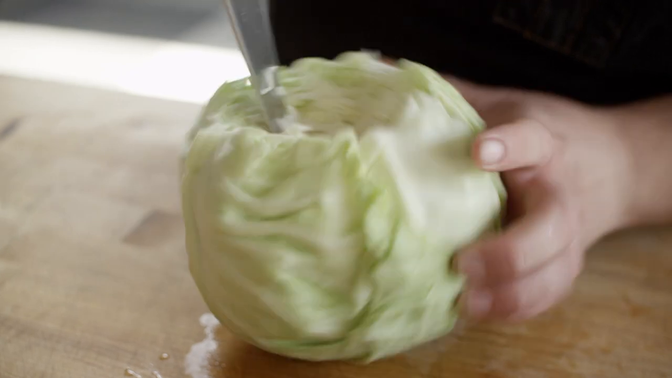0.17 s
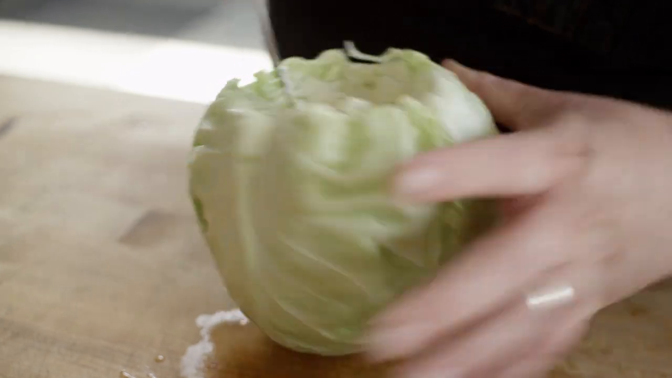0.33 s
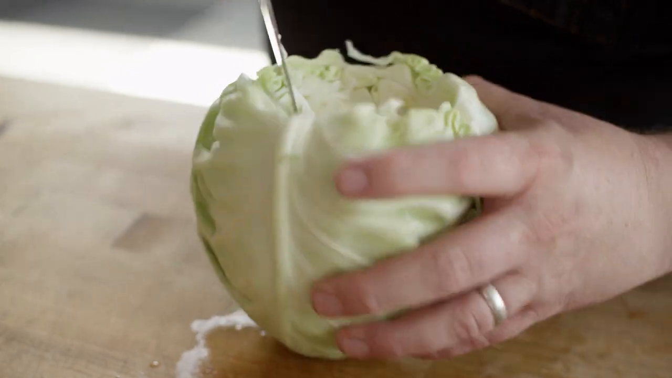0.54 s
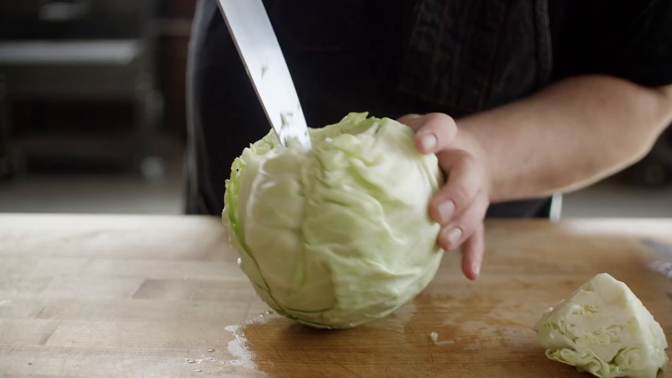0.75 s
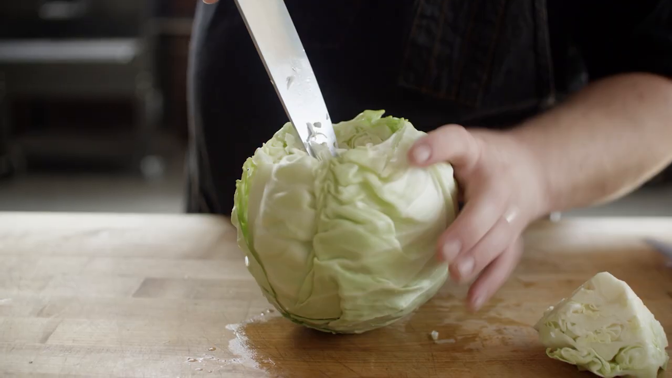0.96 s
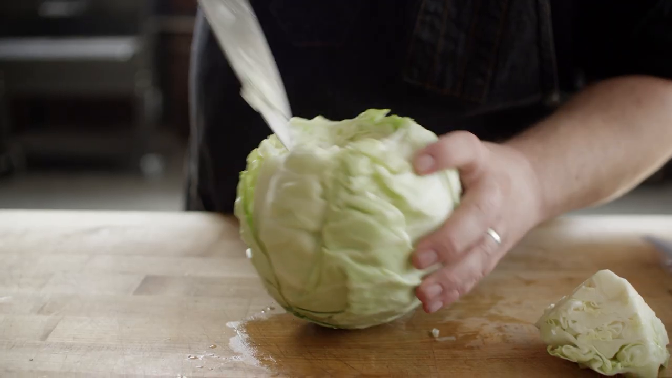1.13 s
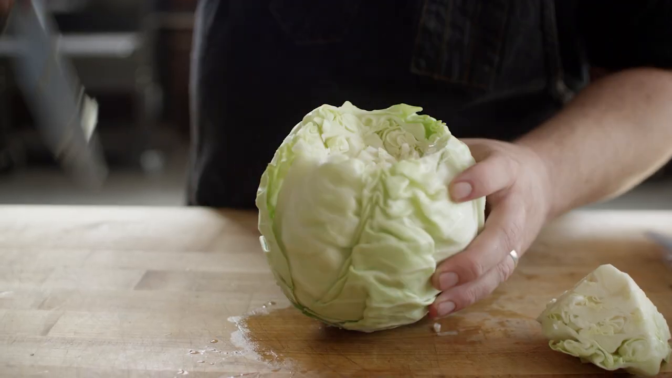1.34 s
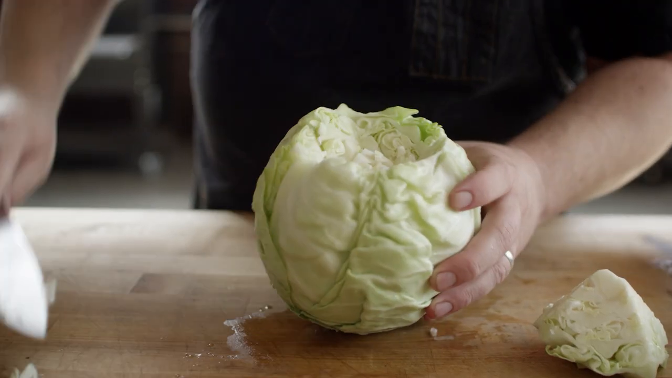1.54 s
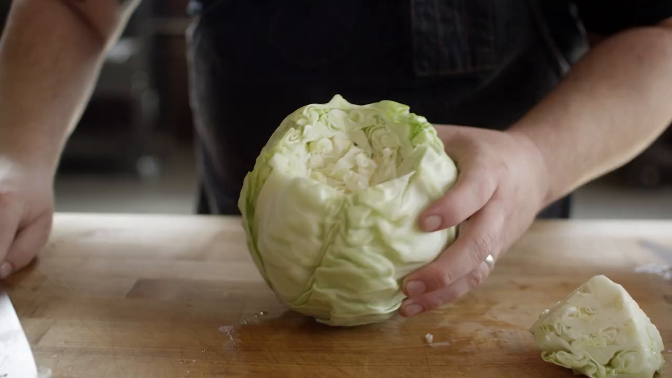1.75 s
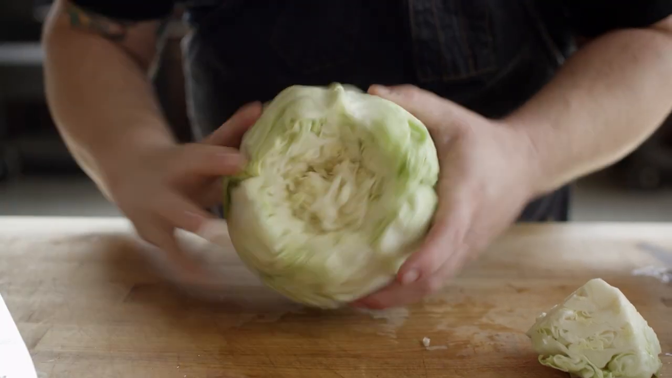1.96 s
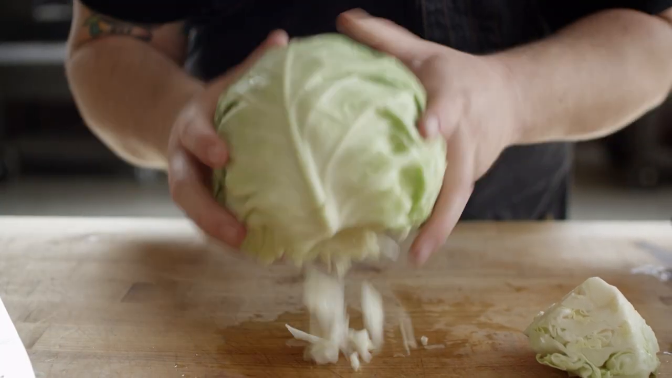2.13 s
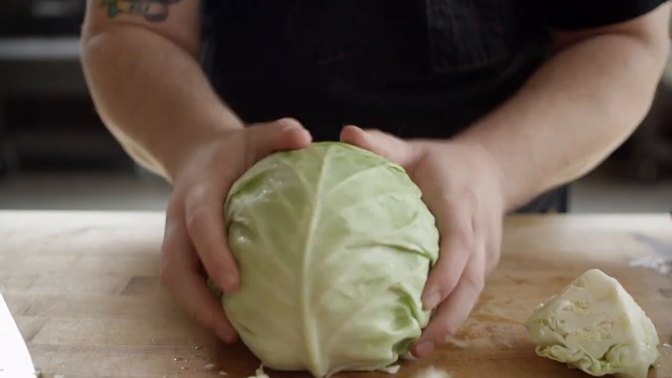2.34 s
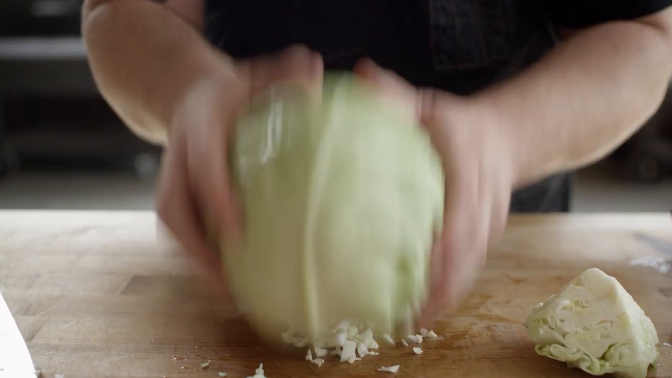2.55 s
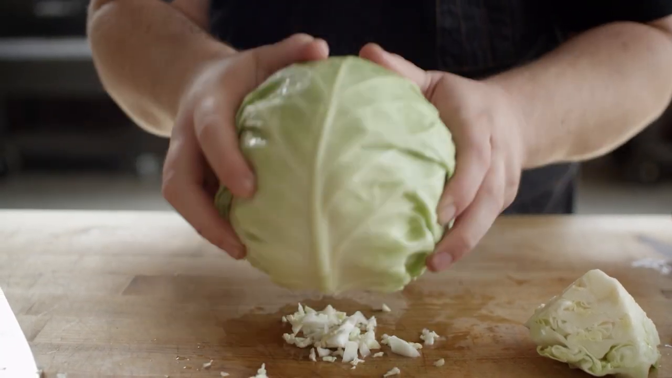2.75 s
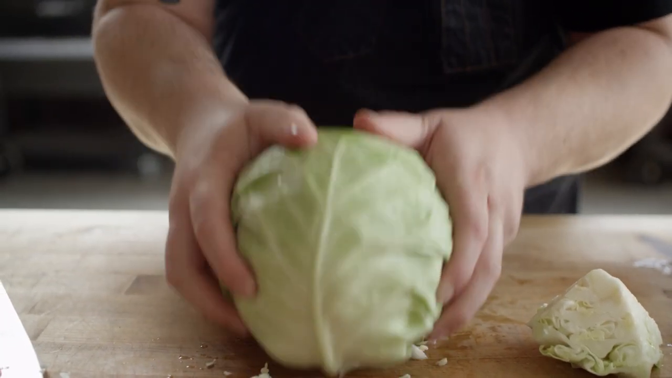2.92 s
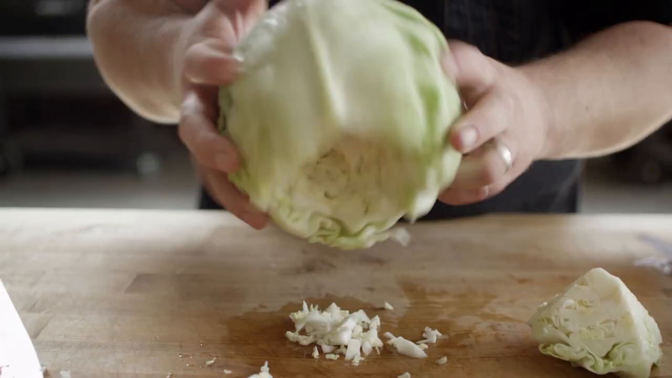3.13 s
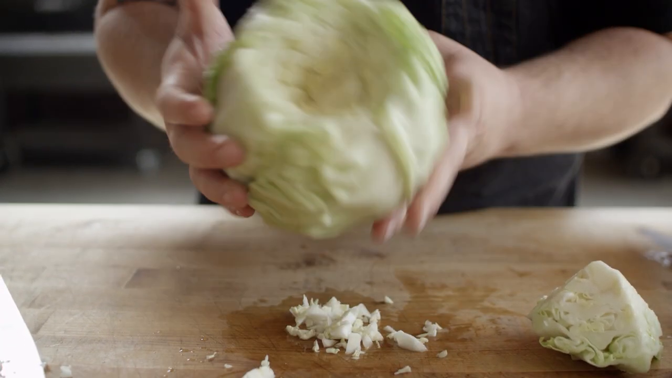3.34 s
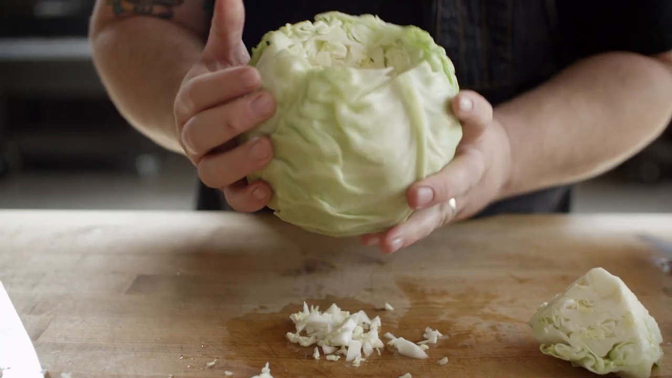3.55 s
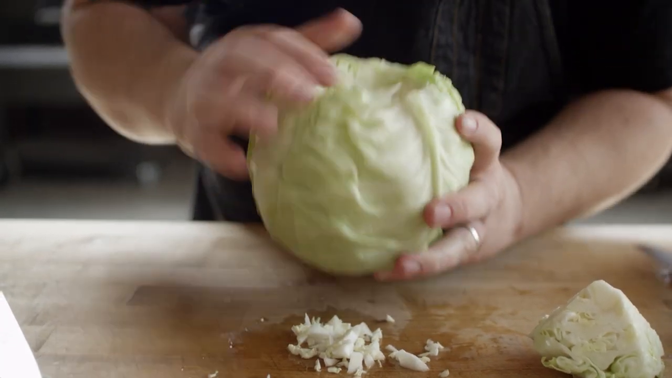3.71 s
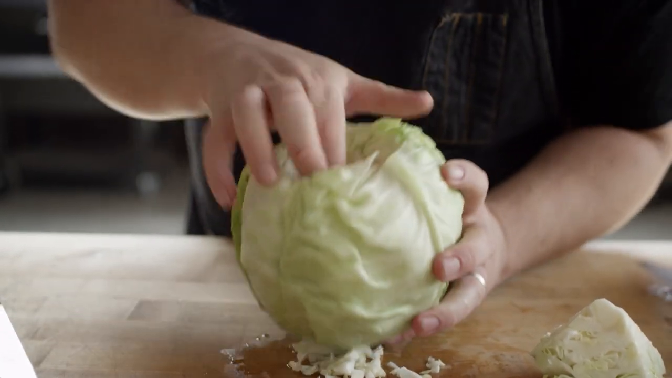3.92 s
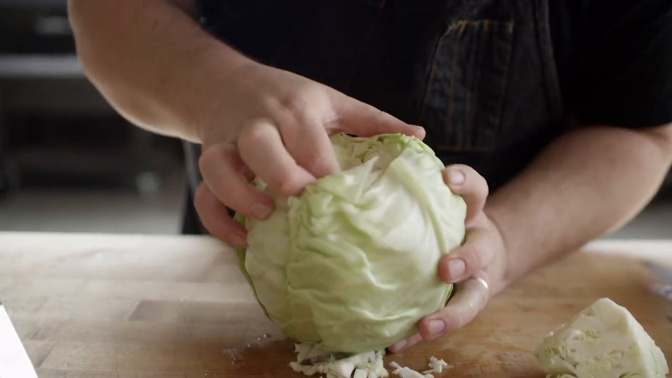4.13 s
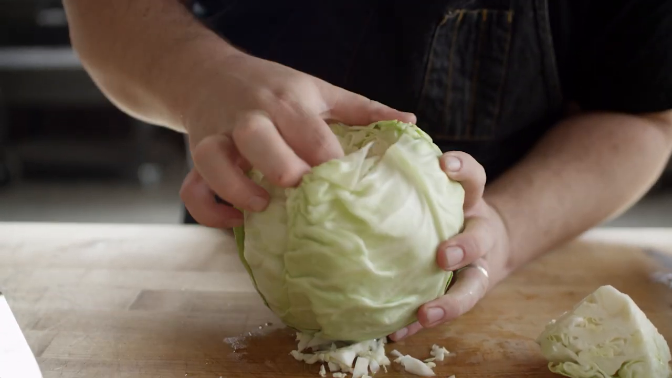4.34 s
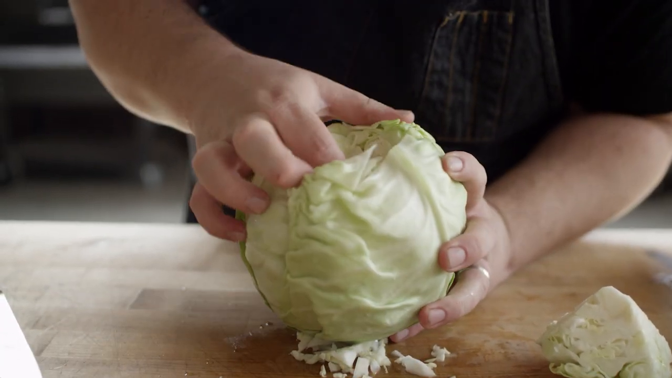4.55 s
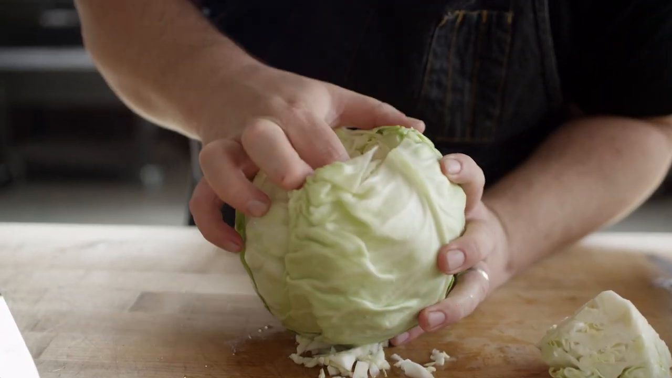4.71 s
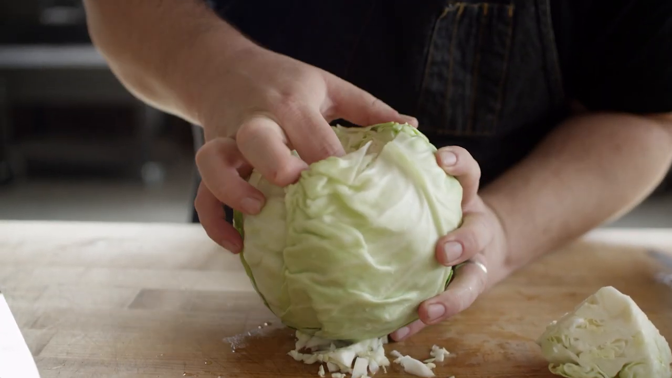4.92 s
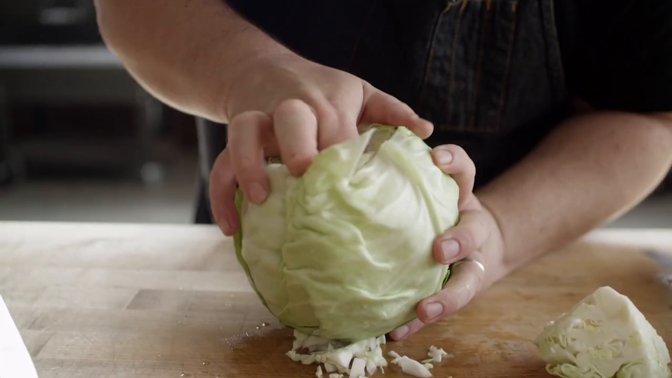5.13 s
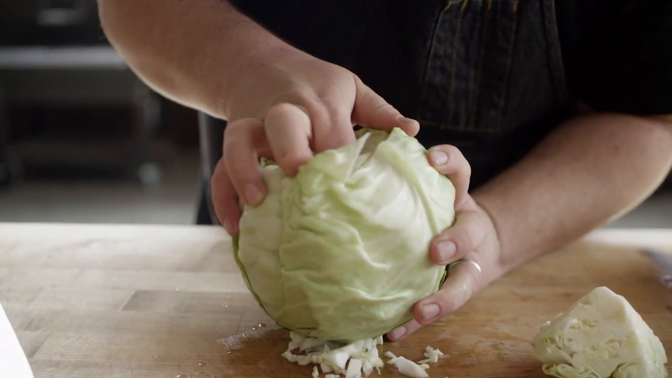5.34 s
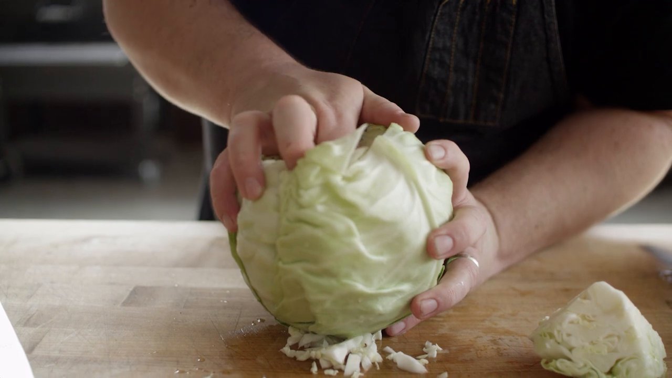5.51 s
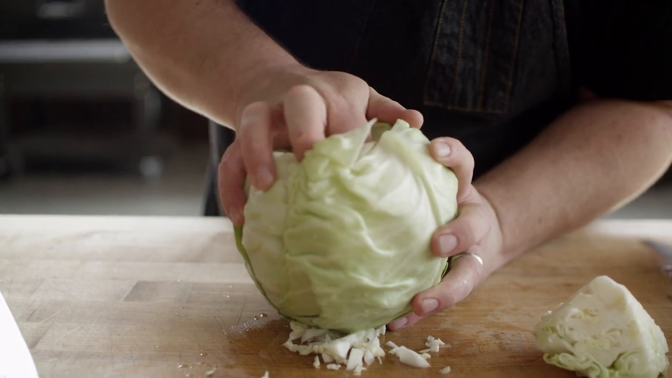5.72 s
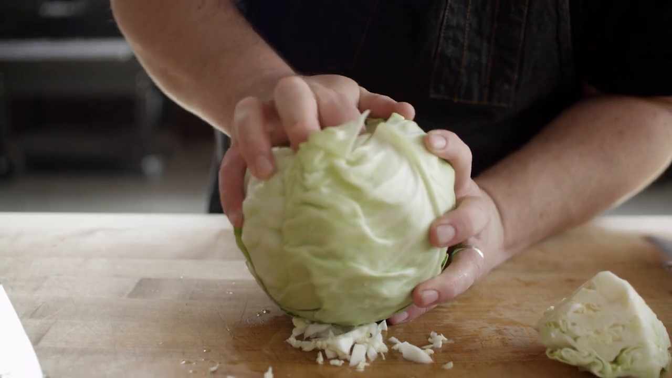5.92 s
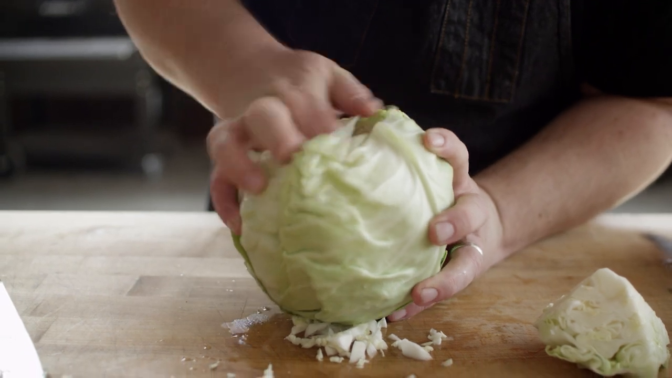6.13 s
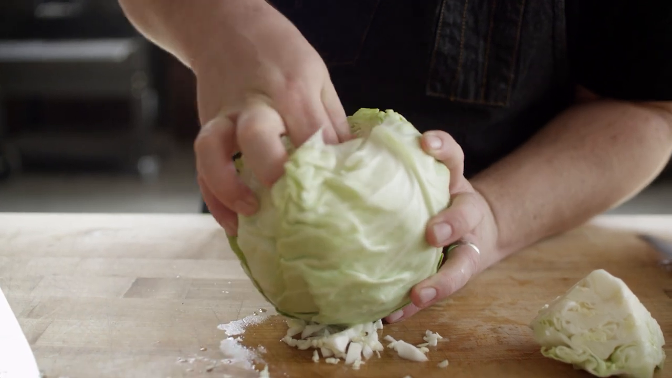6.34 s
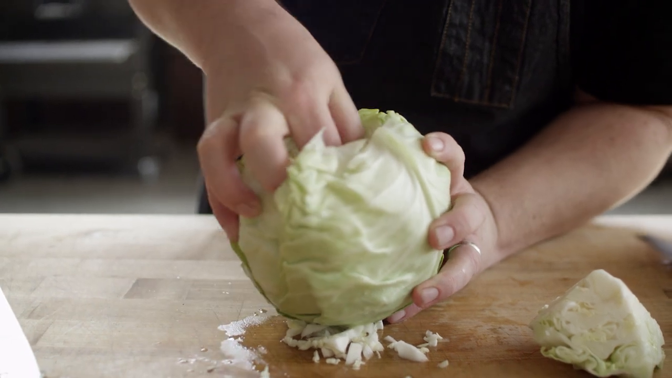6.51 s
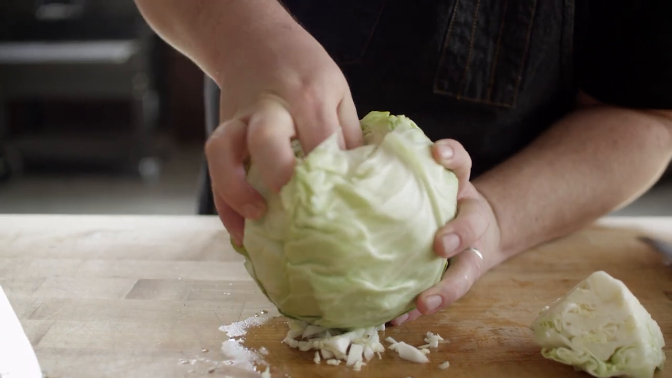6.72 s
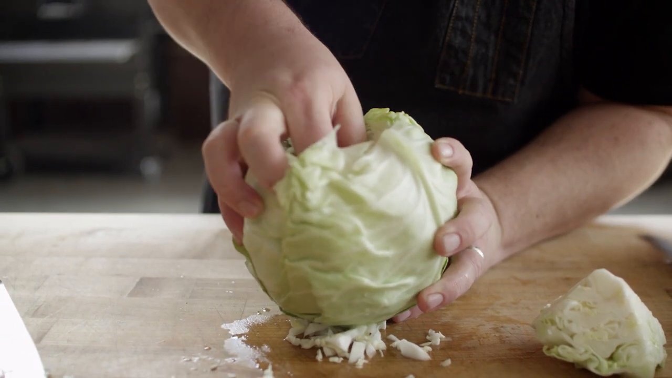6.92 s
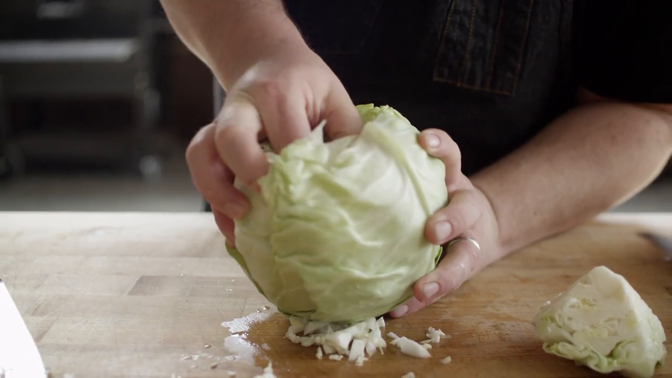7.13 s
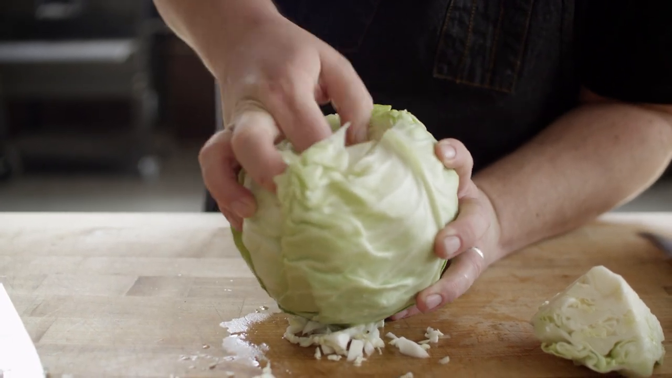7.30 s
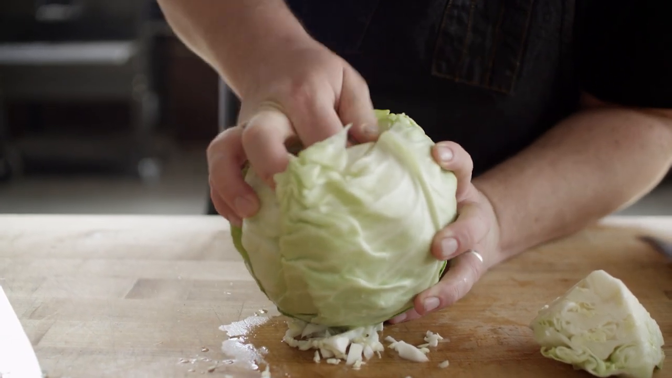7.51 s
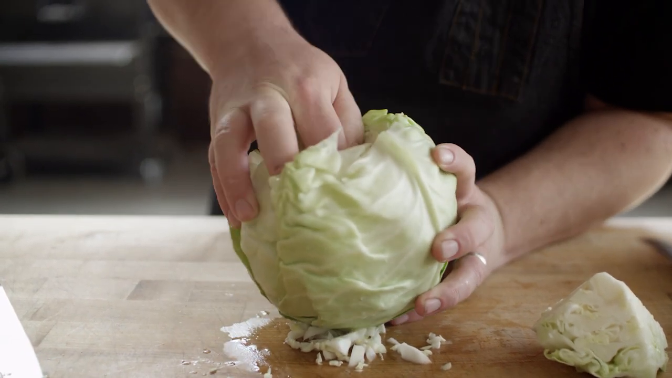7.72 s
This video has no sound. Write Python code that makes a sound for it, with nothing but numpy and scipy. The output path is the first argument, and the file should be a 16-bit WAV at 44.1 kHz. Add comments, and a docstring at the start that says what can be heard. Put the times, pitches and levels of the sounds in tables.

```python
"""A raw cabbage is cored, knocked and picked apart: bursts of noise grains crackle through broad resonances.
A knife pries the core out in short strokes and is laid on a wooden bench, ringing steel and wood modes.
Three knocks of the head thud with sinking pitch, rebound and shed crumbs; loose things chatter as the bench sways.
Then fingers pick at the crisp inner leaves, as a dull rumble of coloured noise, like traffic outside, swells."""
import sys
import numpy as np
from scipy import signal
from scipy.fft import rfft, irfft
from scipy.io import wavfile
from scipy.ndimage import uniform_filter1d

SR = 44100
rng = np.random.default_rng(int(sys.argv[2]) if len(sys.argv) > 2 else 0)


def persist_wave(psi):
    """Save psi, clipped to +-1, as 16-bit WAV."""
    counts = np.round(np.clip(psi, -1, 1) * 32767).astype(np.int16)
    wavfile.write(sys.argv[1], SR, np.atleast_2d(counts).T)


N = 346747
T = np.arange(N) / SR

# knocks of the head on the bench: start_s, thud_db, rebound_slap_db
KNOCKS = [(2.3876, -17, -6), (2.655, -19, -11.5), (2.928, -17.5, -10.5)]


def from_db(db):
    """Decibels to gain."""
    return 10 ** (np.asarray(db) / 20)


def rms_one(x):
    """Scale to unit rms."""
    return x / np.sqrt(np.mean(x ** 2) + 1e-20)


def at_hz(points, hz):
    """Read a table on a log-frequency axis."""
    f, value = np.transpose(points)
    return np.interp(np.log(hz + 1), np.log(f), value)


def colour(x, spectrum, size=4096):
    """Causal (minimum-phase) filter of unit energy with the given spectrum."""
    cepstrum = irfft(np.log(from_db(at_hz(spectrum, np.fft.rfftfreq(size, 1 / SR)))))
    cepstrum[1:size // 2] *= 2
    cepstrum[size // 2 + 1:] = 0
    response = irfft(np.exp(rfft(cepstrum)))
    return signal.oaconvolve(x, response / np.linalg.norm(response))[:N]


def noise(spectrum):
    """Steady coloured noise of rms about 1."""
    return colour(rng.standard_normal(N), spectrum)


def drift(knots_per_s):
    """Random level of rms 1, linear between random knots."""
    knots = rng.standard_normal(int(N / SR * knots_per_s) + 2)
    return rms_one(np.interp(T * knots_per_s, np.arange(len(knots)), knots))


def ring(x, hz, t60_s):
    """One mode: a unit click sets a sine of height 1 ringing."""
    r = from_db(-60 / (t60_s * SR))
    w = 2 * np.pi * hz / SR
    return signal.lfilter([0, np.sin(w)], [1, -2 * r * np.cos(w), r * r], x + 1e-18)


def resonance(x, hz, q):
    """A resonance of gain 1 at its centre."""
    return signal.lfilter(*signal.iirpeak(min(hz, 0.45 * SR), q, fs=SR), x + 1e-18)


def clicks(times_s, db):
    """One impulse per contact."""
    out = np.zeros(N)
    out[(np.asarray(times_s) * SR).astype(int)] = from_db(db)
    return out


def grains(per_s, spread_db):
    """Cell walls bursting at random, in uneven sizes; rms 1."""
    size_db = spread_db * np.minimum(rng.exponential(1, N), 4)
    sizes = from_db(size_db) * rng.choice([-1, 1], N)
    return rms_one(sizes * (rng.random(N) < per_s / SR))


def crackle(per_s, spread_db, count=10):
    """Lone cells bursting in clumps, each at one of several pitches; rms 1."""
    cells = grains(per_s, spread_db) * from_db(3.9 * drift(80))
    dealt = rng.integers(0, count, N)
    out = np.zeros(N)
    for k, hz in enumerate(np.geomspace(1200, 14500, num=count)):
        out += resonance(cells * (dealt == k), hz, q=4.0) * from_db(4.3 * drift(30))
    return rms_one(out)


def bursts(rows, rise_s, source):
    """Grain avalanches (start_s, level_db, dying_s, pitch_hz): quick build-up, decay, ring of the breaking piece."""
    out = np.zeros(N)
    for start_s, level_db, dying_s, hz in rows:
        part = slice(max(int((start_s - 5 * rise_s) * SR), 0), int((start_s + 6 * dying_s) * SR))
        t = T[part] - start_s
        shape = np.exp(np.minimum(t / rise_s, -t / dying_s))
        burst = shape * source[part]
        burst = burst + 0.95 * resonance(burst, hz, q=1.95)
        out[part] += from_db(level_db) * burst * np.linalg.norm(shape) / (np.linalg.norm(burst) + 1e-9)
    return out


def strokes(rows, attack_s, release_s, swell_db=0):
    """Gain of movements (start_s, length_s, level_db): rise, hold or tilt, fall; attack and release span 20 dB."""
    gain_db = -140
    for start_s, length_s, level_db in rows:
        before_s = np.maximum(start_s - T, 0)
        after_s = np.maximum(T - start_s - length_s, 0)
        tilt_db = swell_db * (np.clip((T - start_s) / length_s, 0, 1) - 0.5)
        edges_db = 20 * (before_s / attack_s + after_s / release_s)
        gain_db = np.maximum(gain_db, level_db + tilt_db - edges_db)
    return from_db(gain_db)


def disperse(x, hz, count):
    """Bending waves in wood: the treble arrives first, the bass trails."""
    k = np.exp(-2 * np.pi * hz / SR)
    for _ in range(count):
        x = signal.lfilter([k, -1], [1, -k], x)
    return x


def scatter(x, share, dying_s):
    """Each blow spreads through dense short bench modes, differently at every contact: a noise tail."""
    t = T[:SR // 4]
    decay = (np.exp(-t / dying_s) * (1 - np.exp(-t / 0.0008))) ** 2
    energy = np.maximum(signal.oaconvolve(x ** 2, decay / decay.sum())[:N], 0)
    return x + share * np.sqrt(energy) * rng.standard_normal(N)


def bench(times_s, db, uneven_db):
    """Every blow excites each long mode of the bench with a strength of its own."""
    # modes of the bench: pitch_hz, relative_db, t60_s
    modes = [(192.8, -3.5, 0.79), (312, -17, 0.55), (385.4, -8.5, .25), (433.2, 0.5, 0.28), (583, -7, .3),
             (615, -4, 0.2), (768, -2, .24), (781, -2.5, 0.12), (892, -7, 0.36), (950, -4.5, 0.24),
             (999, -9, 0.34), (1150, -17.5, 0.28), (1475, -6, 0.12), (1570, -21, 0.071), (1700, -14, .3),
             (1740, -11, 0.17), (1870, -7, 0.21), (2041, -8, 0.18)]
    out = np.zeros(N)
    for hz, level_db, t60_s in modes:
        blow_db = db + level_db + uneven_db * rng.standard_normal(len(db))
        out += ring(clicks(times_s, blow_db), hz, t60_s)
    return out


def blade(x, scraped=False):
    """The steel rings thinly; a scrape favours other modes than a blow."""
    # modes of the blade: pitch_hz, struck_relative_db, scraped_relative_db, t60_s
    modes = [(2010, -29, -24, 0.032), (2440, -29, -27, .05), (2670, -15, -39, 0.17), (3160, -22, -38, 0.17),
             (3500, -24, -42, 0.18), (3660, -21, -32, 0.1), (4350, -26, -30, .07), (5180, -29, -35, 0.099),
             (5660, -38, -38, 0.081), (5840, -30, -42, .06), (6160, -28, -41, 0.1), (6850, -46, -40, .06),
             (7176, -54, -45, .13), (8300, -42, -46, 0.07), (8950, -41, -43, .1), (9510, -52, -37, .06),
             (9830, -43, -42, .1), (12230, -43, -39, 0.13), (13100, -54, -33, .1)]
    out = np.zeros(N)
    for hz, struck_db, scraped_db, t60_s in modes:
        out += from_db(scraped_db if scraped else struck_db) * ring(x, hz, t60_s)
    return out


def kitchen(x):
    """Diffuse reverberation, decaying noise bands whose treble dies first."""
    # reverberation time: freq_hz, t60_s
    decay_times = [(100, 1), (400, 1), (1000, 0.99), (2000, 0.62), (4000, 0.48), (8000, 0.19),
                   (16000, 0.18)]
    t, response = T[:SR], 0
    edges_hz = np.geomspace(60, 17000, num=12)
    for low, high in zip(edges_hz, edges_hz[1:]):
        band_filter = signal.butter(2, [low, high], "band", fs=SR, output="sos")
        band = signal.sosfilt(band_filter, rng.standard_normal(SR))
        response = response + band * from_db(-60 * t / at_hz(decay_times, np.sqrt(low * high)))
    response = response * (1 - np.exp(-t / 0.0024))
    return signal.oaconvolve(x, response / np.linalg.norm(response))[:N]


def note(white, hz, t60_s):
    """A levelled tone, noise through one mode, whose pitch wanders about hz; rms about 1."""
    tone = ring(white, hz, t60_s)
    return tone / np.sqrt(np.maximum(uniform_filter1d(tone ** 2, size=4000), 1e-12))


def drones():
    """Wavering engine notes, each with its octave, come and go."""
    # drones: start_s, length_s, level_db, pitch_hz, t60_s (longer is steadier), octave_relative_db
    rows = [(0.0, 0.13, -56.5, 211.6, 1, -16), (4.2, 1.5, -59, 285.1, 0.71, 7),
            (5.953, 0.36, -40, 287.2, 0.92, -10), (6.662, 0.29, -44.5, 289.3, 0.65, -11),
            (7.25, 0.67, -44.5, 110.8, 0.4, -17)]
    out, white = 0, rng.standard_normal(N)
    for start_s, length_s, level_db, hz, t60_s, octave_db in rows:
        octave = rms_one(ring(white, 2 * hz, 0.19))
        tone = note(white, hz, t60_s) + from_db(octave_db) * octave
        out = out + tone * strokes([(start_s, length_s, level_db)], attack_s=0.45, release_s=0.61)
    return out * from_db(1.0 * drift(11))


def background():
    """Room tone with a ventilation hum, and a hissing rumble with engine drones that fades in."""
    # level curve of the rumble: time_s, relative_db
    traffic = [(3.4, -50), (4.42, -47), (4.59, -43), (6.18, -40), (6.79, -40.5), (7.23, -43), (7.5, -41.5),
               (7.86, -42.5)]
    # spectra: freq_hz, relative_db
    rumble_colour = [(25, -32), (45, -12), (110, -2.5), (160, -2), (290, -1), (550, -4.5), (900, -9),
                     (1400, -17), (2500, -26.5), (6000, -70.5)]
    hiss_colour = [(500, 6), (1300, 1.5), (2100, 4.5), (3000, -3), (4400, -7), (5600, -8.5), (6700, -15),
                   (15000, -34)]
    room_tone = [(25, -12), (45, -9.5), (70, 0), (120, -3.5), (170, -3.5), (300, -9), (550, -14),
                 (1000, -17.5), (1600, -26.5), (3000, -34), (6500, -46), (15500, -45.5)]
    time_s, level_db = np.transpose(traffic)
    fade_in = np.exp(np.minimum(T - time_s[0], 0) / 0.33)
    swell = from_db(np.interp(T, time_s, level_db)) * fade_in
    hum = rms_one(ring(rng.standard_normal(N), 118.6, 0.49))
    air = from_db(-50.5) * noise(room_tone) + from_db(-54.0) * hum
    rumble = from_db(1.5) * noise(rumble_colour) + from_db(-13.5) * noise(hiss_colour)
    return air + swell * rumble + drones()


def whistles():
    """Faint, very high whistles arch up and down, each with a weaker one below it."""
    # whistles: crest_s, half_length_s, crest_hz, level_db
    rows = [(1.76, 0.18, 15300, -80), (1.862, .1, 16000, -75), (3.7, 0.099, 16100, -78),
            (4.043, .14, 15800, -76)]
    arch_hz, waver_hz, lower_ratio = 3500, 70, 0.99
    out = np.zeros(N)
    for crest_s, half_s, crest_hz, level_db in rows:
        away = np.clip((T - crest_s) / half_s, -1, 1)
        pitch_hz = crest_hz - arch_hz * away ** 2 + waver_hz * drift(400)
        turns = np.cumsum(pitch_hz) / SR
        pair = np.sin(2 * np.pi * turns) + from_db(-12) * np.sin(2 * np.pi * lower_ratio * turns)
        out += from_db(level_db + 3.3 * drift(30.2)) * np.sqrt(1 - away ** 2) * pair
    return out


def brushing():
    """Soft swishes of cloth and skin: coloured noise with a fluttering level."""
    # arm brushing the apron, palms turning the head: start_s, length_s, level_db
    rows = [(1.15, 0.094, -60), (1.25, 0.23, -64), (2.06, 0.11, -60.5)]
    # spectrum: freq_hz, relative_db
    brush_colour = [(500, -1), (1500, 12.5), (3200, 7.5), (6000, -1), (9000, -7), (16000, -26)]
    moves = strokes(rows, attack_s=0.11, release_s=0.16)
    return moves * noise(brush_colour) * from_db(3.0 * drift(49.13))


def gripping():
    """Dull friction of the palms, carried by the solid head into the bench."""
    # hands shifting their grip on the head: start_s, length_s, level_db
    rows = [(0.0, 0.079, -53.5), (.78, 0.12, -52), (4.53, 0.12, -40.5), (4.7, 0.18, -51),
            (5.07, 0.24, -41.5), (6.6, 1.1, -50)]
    # spectrum: freq_hz, relative_db
    grip_colour = [(25, -10), (50, -5), (90, -0.5), (170, -0.5), (280, -1.5), (450, -6.5), (900, -31),
                   (3000, -34), (5500, -37.5), (9000, -40.5), (15000, -56)]
    moves = strokes(rows, attack_s=0.14, release_s=0.42)
    return moves * noise(grip_colour) * from_db(1.4 * drift(25))


def rattling():
    """At every knock leaves crunch and crumbs land; then loose things chatter, more dully, as the bench sways."""
    # crunches of contact, rebound and landing crumbs: start_s, relative_db, rise_s, dying_s, pitch_hz
    crunches = [(2.3865, -21.5, 0.0018, .0035, 5060), (2.431, -23.5, 0.0028, 0.0089, 2500),
                (2.459, -19.5, 0.0024, .008, 3250), (2.654, -25, .002, 0.0037, 4930),
                (2.698, -25.5, 0.0037, 0.0079, 2580), (2.726, -20.5, 0.0022, 0.0085, 2700),
                (2.927, -23.5, 0.0016, .004, 4830), (2.9655, -26.5, .001, 0.012, 2240),
                (2.9936, -18.5, .0005, 0.0074, 2800), (3.008, -27, 0.0036, .008, 3200)]
    # chatter of loose things: start_s, relative_db
    chatter = [(2.503, -30), (2.552, -30), (2.578, -31.5), (2.766, -29.5), (2.8187, -29.5), (2.867, -32),
               (3.04, -29), (3.087, -32.5), (3.135, -33)]
    # spectrum: freq_hz, relative_db
    rattle_colour = [(100, 7.5), (350, 6), (800, -4.5), (1150, 0.5), (1850, 3), (2350, -8.5), (2750, -6),
                     (3500, -7.5), (4100, -12), (4700, -12), (7000, -19), (12000, -20.5), (16000, -22.5)]
    chatter_dying_s, chatter_hz = 0.01, 2700
    crumbs_s, crumbs_db = 0.086, -42.5
    cells = grains(15000, spread_db=1.0)
    crunch = np.zeros(N)
    for start_s, level_db, rise_s, dying_s, hz in crunches:
        crunch += bursts([(start_s, level_db, dying_s, hz)], rise_s, cells)
    chatter_rows = [(s, db, chatter_dying_s, chatter_hz) for s, db in chatter]
    rattle = bursts(chatter_rows, rise_s=0.0016, source=grains(6000, spread_db=2.0))
    pour = strokes([(s, crumbs_s, crumbs_db) for s, *_ in KNOCKS], attack_s=0.006, release_s=0.31)
    crumbs = pour * grains(per_s=4500, spread_db=5.0)
    # brightens the crunch, dulls the chatter
    treble = signal.lfilter(*signal.butter(1, 4500, "high", fs=SR), 0.19 * crunch - 0.18 * rattle)
    return colour(crunch + rattle + crumbs + treble, rattle_colour)


def knife_down():
    """Handle and blade clatter onto the wood; the bench and the steel ring briefly."""
    # contacts of knife and bench: start_s, wood_relative_db, blade_relative_db
    contacts = [(1.801, -31.5, -24.5), (1.8437, -9.5, -21), (1.8468, 0.5, -23), (1.857, -12, -20),
                (1.8752, -5.5, -9), (1.8786, -2, -16), (1.890, -13.5, -28), (1.903, -13.5, -33),
                (1.917, -9.5, -38)]
    # spectrum: freq_hz, relative_db
    knock_colour = [(60, -7.5), (180, 2.5), (300, -1), (420, 6.5), (700, 8), (950, 7), (1200, 3), (1550, 9),
                    (2000, 5), (2170, -10), (2600, -6), (2900, -16), (3500, -13.5), (4300, -20),
                    (5000, -44), (7000, -48), (15000, -51)]
    times_s, wood_db, blade_db = np.transpose(contacts)
    blows = disperse(clicks(times_s, wood_db), hz=1165, count=8)
    knocks = colour(scatter(blows, share=1.0, dying_s=0.02), knock_colour)
    taps = clicks(times_s, blade_db)
    # the flat of the blade slaps down
    clack = scatter(taps, share=2.9, dying_s=0.0019)
    for _ in range(2):
        clack = resonance(clack, 3800, q=2.2)
    wood = from_db(5.0) * knocks + from_db(-26.0) * bench(times_s, wood_db, uneven_db=2.4)
    return wood + from_db(-12.0) * blade(taps) + from_db(-16) * clack


def picking():
    """Ribs snap, damp leaves tear and crackle, and skin hisses as it slides over them."""
    # leaf ribs snapping: start_s, relative_db, pitch_hz
    rib_snaps = [(2.335, -47, 4500), (3.435, -48.5, 9000), (4.124, -47, 3300), (4.2071, -38, 10000),
                 (4.6363, -43, 3300), (4.724, -41.5, 11000), (4.777, -43, 3300), (4.786, -38, 3500),
                 (4.8235, -47, 12000), (5.036, -43, 11000), (5.065, -48, 5500), (5.134, -42, 5300),
                 (5.266, -28, 4340), (5.328, -40.5, 8000), (5.518, -48, 9000), (5.709, -43, 10000),
                 (5.795, -45, 5500), (5.822, -44.5, 10000), (5.878, -43, 12000), (6.1837, -37, 11000),
                 (6.1965, -33, 11000), (6.204, -38, 11000), (6.268, -49, 11000), (6.507, -43, 10000),
                 (6.748, -45, 10000), (6.806, -45, 5600), (6.827, -43, 13000), (6.871, -48, 5200),
                 (6.97, -51, 14000), (7.04, -52, 5700), (7.075, -46, 12000), (7.37, -39, 12000),
                 (7.6, -43, 13000)]
    # leaves tearing in short soft crunches: start_s, relative_db, pitch_hz
    tears = [(4.155, -49, 4100), (4.168, -50.5, 2900), (4.188, -56, 4500), (6.214, -43, 4530),
             (6.341, -52, 3800), (6.453, -50, 3500), (6.485, -53, 3400), (6.727, -54, 3600),
             (6.838, -57, 4000), (7.087, -54, 5500), (7.11, -51.5, 3900), (7.513, -45.5, 3400),
             (7.528, -48, 3780), (7.556, -51, 3400)]
    # finger strokes over the leaves: start_s, length_s, crackle_db, sliding_db
    rubbing = [(1.397, .55, -82, -72), (2.048, .12, -67, -77), (3.23, 0.12, -66, -67),
               (3.606, 0.63, -86, -72), (4.01, .07, -65, -84), (4.14, 0.038, -67, -74),
               (4.443, 0.34, -69, -72), (4.76, 0.19, -64.5, -68), (5.08, 0.11, -68, -82),
               (6.02, 0.045, -62, -73), (6.197, .03, -53.5, -75), (6.24, 0.04, -61.5, -78),
               (6.435, 0.074, -62, -61), (6.63, 0.2, -64, -70), (6.89, 0.22, -64, -80),
               (7.095, 0.64, -68.5, -64), (7.51, 0.035, -63, -64)]
    # spectra: freq_hz, relative_db
    snap_colour = [(300, -17), (1500, 7), (2800, 10.5), (4300, 6.5), (5500, 6), (7000, -0.5), (10000, 5.5),
                   (13000, 4), (16000, 4)]
    rub_colour = [(1000, 2), (3500, 12), (5500, 1.5), (7500, -5.5), (10000, 2.5), (13000, 3), (16000, -1)]
    slide_colour = [(3000, -13), (8000, -17), (10500, -15), (13000, -9), (14500, -13), (16000, -12)]
    snap_dying_s, tear_dying_s = 0.00096, 0.0065
    attack_s, release_s = 0.045, 0.084
    press = strokes([(s, length, db) for s, length, db, _ in rubbing], attack_s, release_s)
    slide = strokes([(s, length, db) for s, length, _, db in rubbing], attack_s, release_s)
    breaks = [(s, db, snap_dying_s, hz) for s, db, hz in rib_snaps]
    breaks += [(s, db, tear_dying_s, hz) for s, db, hz in tears]
    snaps = colour(bursts(breaks, rise_s=0.0001, source=grains(17000, spread_db=0.5)), snap_colour)
    snaps = signal.sosfilt(signal.butter(3, 14800, fs=SR, output="sos"), snaps)
    rub = colour(crackle(per_s=2700, spread_db=5.0), rub_colour)
    return snaps + press * rub + slide * noise(slide_colour)


def cutting():
    """Each stroke crackles, squeaks at a pitch of its own and scrapes the steel; fibres crack on the way."""
    # fibres of the core cracking: start_s, relative_db, pitch_hz
    cuts = [(0.0195, -32, 1980), (0.0863, -46, 3500), (0.118, -42, 11000), (0.1776, -34.5, 6500),
            (.194, -46.5, 4000), (0.338, -45, 12000), (0.525, -40, 8060), (.549, -50, 3000),
            (0.767, -30, 2200), (0.776, -42, 10000), (0.932, -44, 13000), (0.987, -42.5, 3960),
            (1.025, -50.5, 3000)]
    # strokes of the blade in the core: start_s, length_s, crackle_db, squeak_hz, steel_relative_db
    prying = [(0.0, 0.011, -47, 4040, -14), (0.087, 0.037, -55.5, 5000, -15), (.16, 0.037, -63, 4000, -9),
              (0.45, 0.028, -59, 4500, -15), (0.532, 0.017, -62, 3740, -17), (0.576, 0.037, -58, 2356, -8),
              (0.73, 0.041, -56, 11000, -5), (0.857, 0.008, -57, 3670, -2), (0.874, .025, -64, 3900, -12),
              (0.94, 0.054, -59, 4040, -5.5)]
    # faint crackle between the strokes: start_s, length_s, level_db
    blade_in_core = (0.0, 0.92, -68.5)
    # the core leaves the tip and the blade pings: start_s, relative_db
    core_flick = [(1.218, -35)]
    # spectrum: freq_hz, relative_db
    cut_colour = [(150, -5), (700, 11.5), (1300, -3), (2100, 4), (3100, -2), (4000, -1), (4900, -3.5),
                  (6300, -5.5), (12000, -6), (16000, -5)]
    attack_s, release_s = 0.034, 0.022
    squeak_q, squeak_gain = 10, 0.96  # the wet cut squeaks narrowly against the steel
    cut_rows = [(s, db, 0.0015, hz) for s, db, hz in cuts]
    splits = bursts(cut_rows, rise_s=0.00033, source=grains(10000, spread_db=2.5))
    cells = crackle(per_s=7000, spread_db=4.0)
    core = splits + cells * strokes([blade_in_core], attack_s, release_s)
    scrape = from_db(-21) * core + clicks(*np.transpose(core_flick))
    for start_s, length_s, level_db, hz, steel_db in prying:
        # each stroke sinks 1 dB over its length
        push = strokes([(start_s, length_s, level_db)], attack_s, release_s, swell_db=-1)
        stroke = push * rms_one(cells + squeak_gain * resonance(cells, hz, squeak_q))
        core = core + stroke
        scrape = scrape + from_db(steel_db) * stroke
    return colour(core, cut_colour) + blade(scrape, scraped=True)


def thud(start_s, start_hz, end_hz, glide_s, sway_hz, sway_t60_s, sway_db):
    """The pitch of the thud sinks as the head squashes; the bench sways on its legs afterwards."""
    t = np.maximum(T - start_s, 0)
    turns = end_hz * t + (start_hz - end_hz) * glide_s * (1 - np.exp(-t / glide_s))
    squash = np.exp(-(t / 0.012) ** 2)
    sway_gain = from_db(sway_db - 60 * t / sway_t60_s) * (1 - squash)
    return sway_gain * np.sin(2 * np.pi * sway_hz * t) - np.sin(2 * np.pi * turns) * squash


def slaps_of_knocks(count=2):
    """The head slaps the bench, then drops back ever more weakly: rows of start_s, relative_db, hollow_hz."""
    contact_db, contact_hz = -6, 503
    rebound_lag_s, rebound_gap_s, rebound_loss_db, rebound_hz = 0.06, 0.025, 5, 380
    rows = []
    for start_s, _, rebound_db in KNOCKS:
        rows.append((start_s + 0.0006, contact_db, contact_hz))
        for k in range(count):
            drop_s = start_s + rebound_lag_s + k * rebound_gap_s
            rows.append((drop_s, rebound_db - k * rebound_loss_db, rebound_hz))
    return rows


def knocking():
    """The head thuds and slaps on the bench, which booms under it; returns lows and slaps."""
    # lone bumps of the head and of falling pieces: start_s, relative_db, hollow_hz
    bumps = [(.701, -30, 547), (.779, -27.5, 260), (.967, -29, 460), (2.238, -24.5, 202),
             (2.4165, -4.5, 660), (2.4395, -5, 420)]
    # spectrum: freq_hz, relative_db
    slap_colour = [(60, -7), (200, 6), (400, 8), (800, 11.5), (1300, -12), (2200, 0), (5000, -30),
                   (15000, -30)]
    thud_lag_s = 0.0035  # the outer leaves touch before the weight arrives
    hollow_db, hollow_t60_s = -8.5, 0.012  # ring of the head within each slap
    soft_contact_hz = 845  # the soft head hardly stirs the bench modes above this
    landings = [(s + thud_lag_s, db) for s, db, _ in KNOCKS]
    thuds = np.zeros(N)
    for start_s, level_db in landings:
        thuds += from_db(level_db) * thud(start_s, start_hz=118.0, end_hz=50, glide_s=0.011,
                                          sway_hz=41.2, sway_t60_s=0.64, sway_db=-10.5)
    weight = clicks(*np.transpose(landings))
    boom = from_db(-14.5) * ring(weight, 192, 1.0) + from_db(-14.0) * ring(weight, 119, 1.46)

    blows = bumps + slaps_of_knocks()
    times_s, blow_db, _ = np.transpose(blows)
    hollow = sum(ring(clicks(s, db + hollow_db), hz, hollow_t60_s) for s, db, hz in blows)
    spread = disperse(clicks(times_s, blow_db), hz=640, count=5)
    slaps = colour(scatter(spread, share=1.24, dying_s=0.017), slap_colour)
    soften = signal.butter(2, soft_contact_hz, fs=SR, output="sos")
    wood = signal.sosfilt(soften, bench(times_s, blow_db, uneven_db=3.0))
    return thuds + boom, slaps + hollow + from_db(-34.0) * wood


def scene():
    """All sources in the kitchen, heard by one microphone."""
    lows, slaps = knocking()
    leaves = cutting() + picking() + brushing()
    knife, rattle = knife_down(), rattling()
    send = from_db(-21.5) * leaves + from_db(-13.5) * knife
    send = send + from_db(-11.0) * slaps + from_db(-13.0) * rattle
    direct = leaves + whistles() + gripping() + knife + lows + slaps + rattle
    return (direct + kitchen(send) + background())[None]


def record(dry):
    """The deepest bass and the top are cut."""
    cutoff_hz = 15850
    x = signal.sosfilt(signal.butter(4, 31, "high", fs=SR, output="sos"), dry)
    return signal.sosfilt(signal.ellip(10, 0.1, 80, cutoff_hz, fs=SR, output="sos"), x)


dry = scene()
out = record(dry)
persist_wave(out)
```